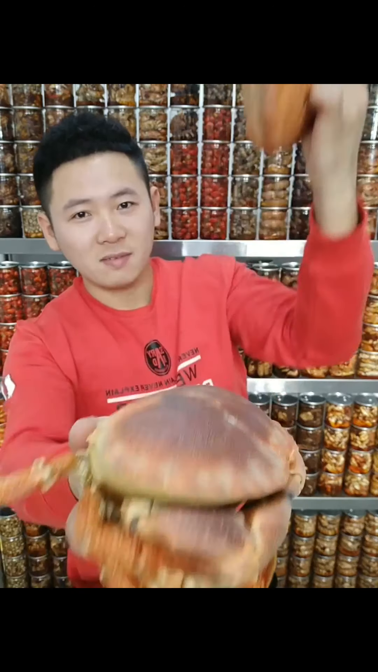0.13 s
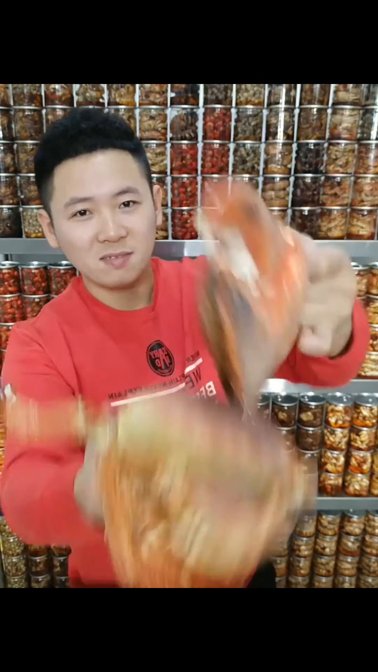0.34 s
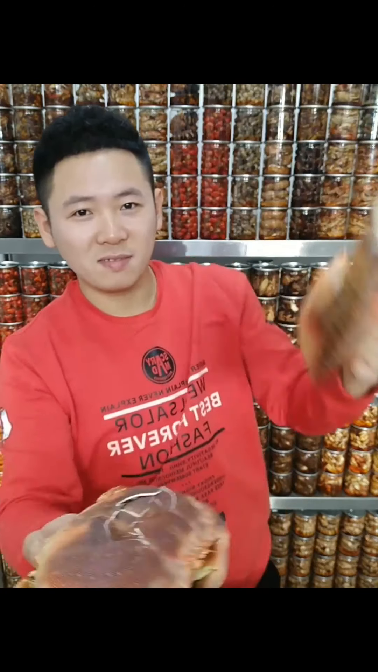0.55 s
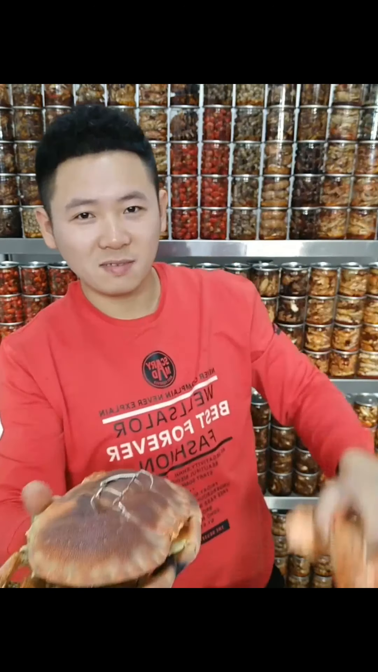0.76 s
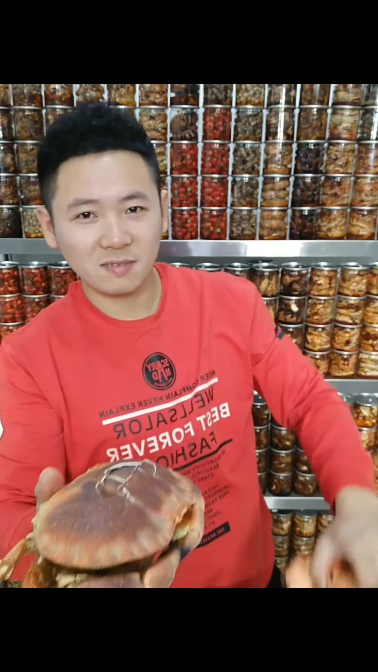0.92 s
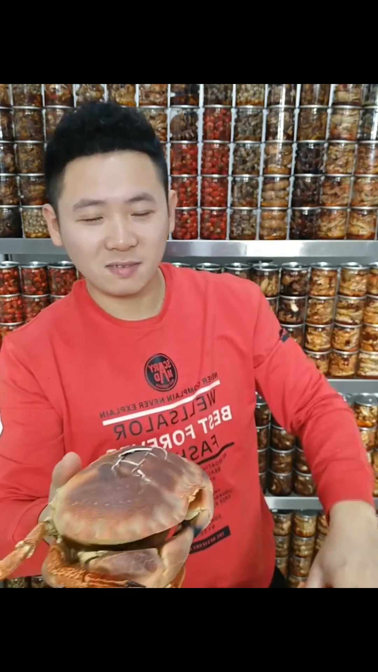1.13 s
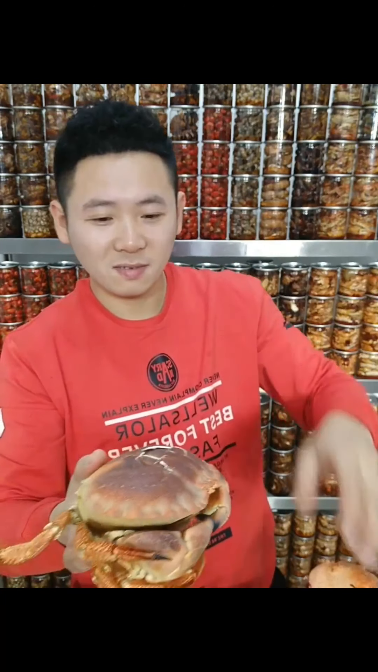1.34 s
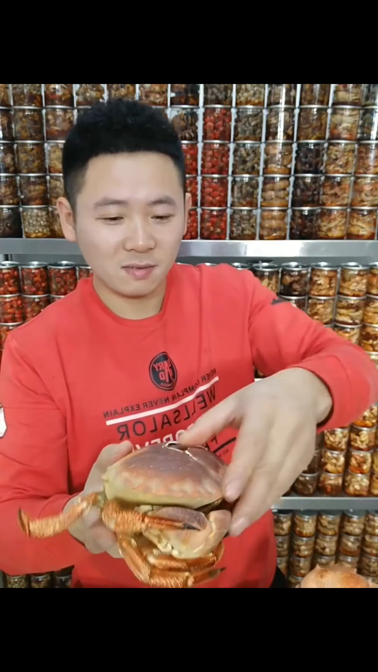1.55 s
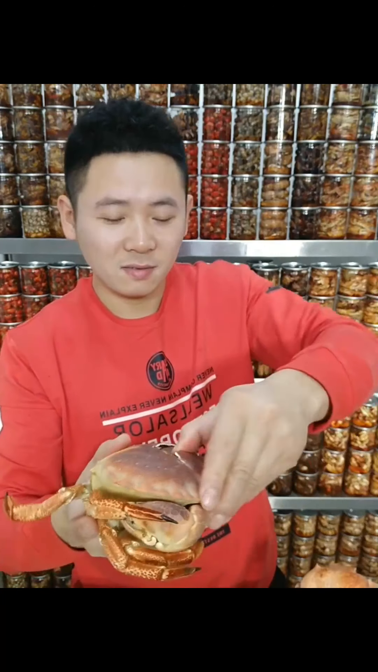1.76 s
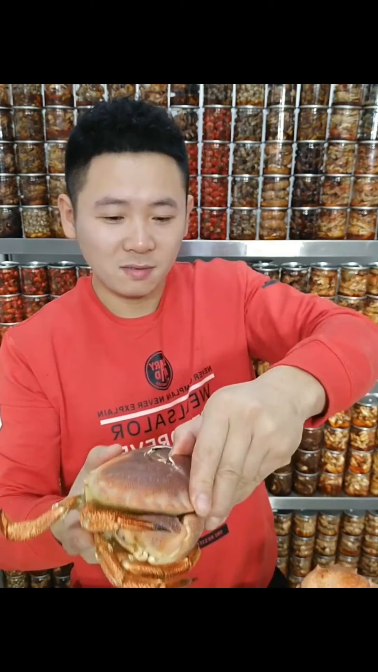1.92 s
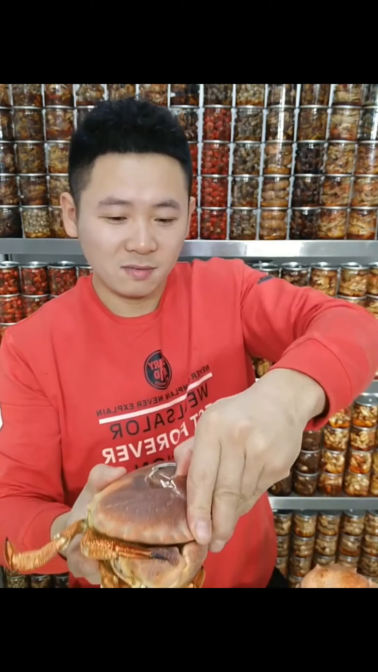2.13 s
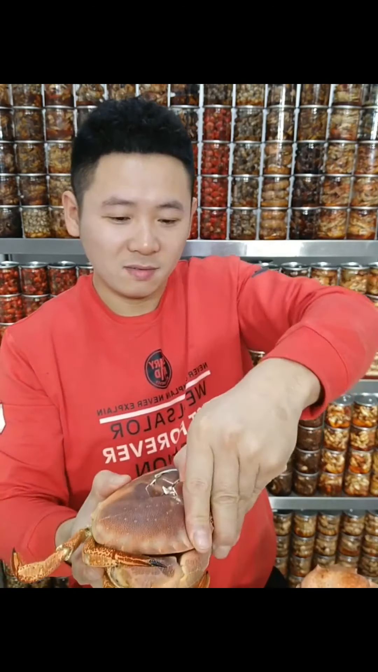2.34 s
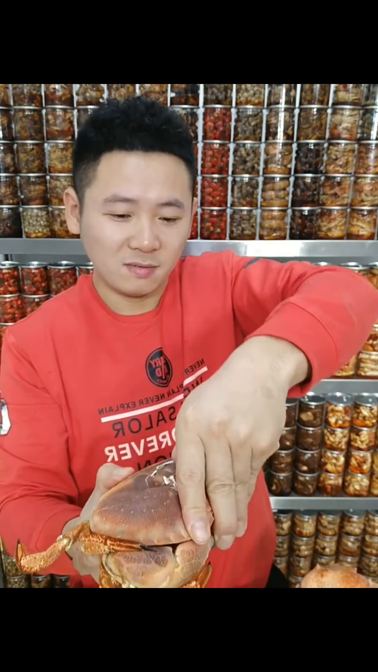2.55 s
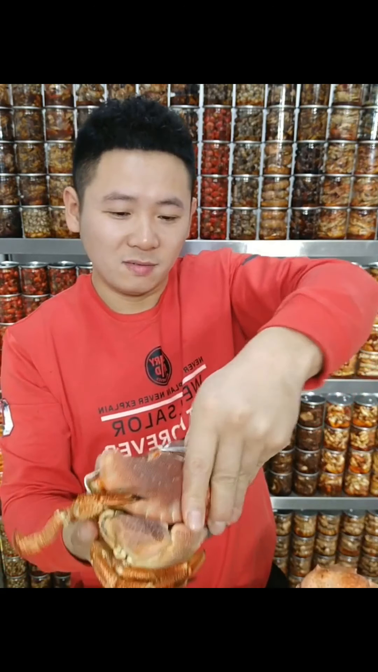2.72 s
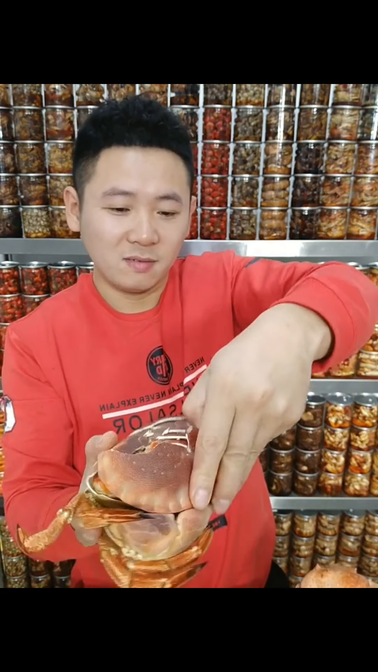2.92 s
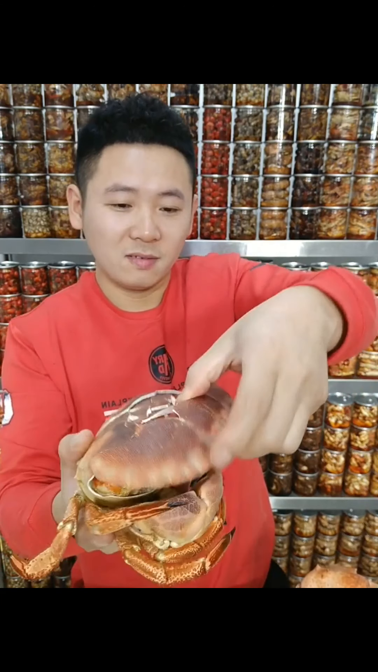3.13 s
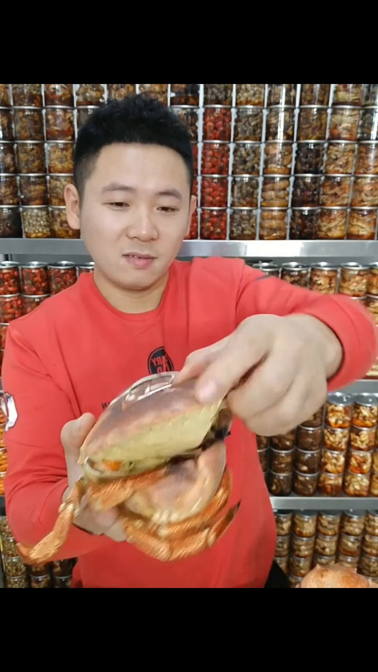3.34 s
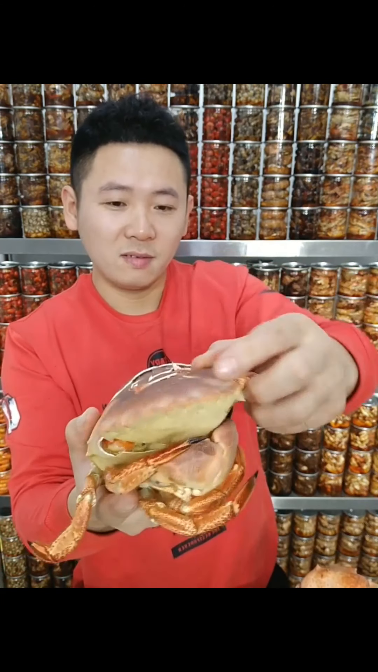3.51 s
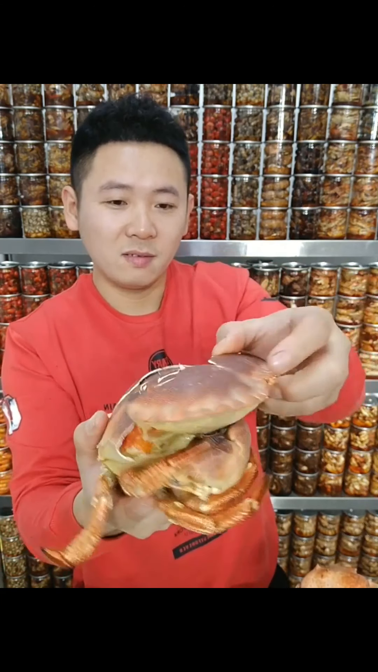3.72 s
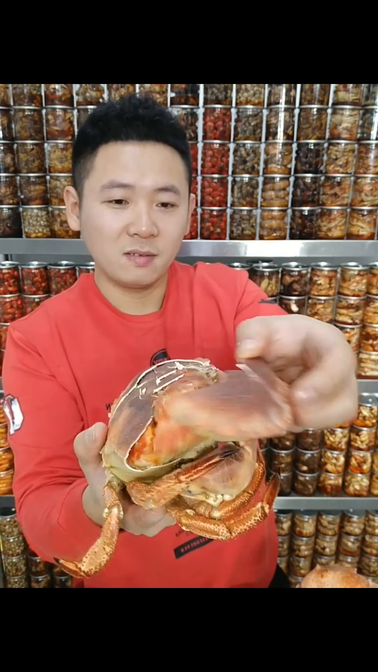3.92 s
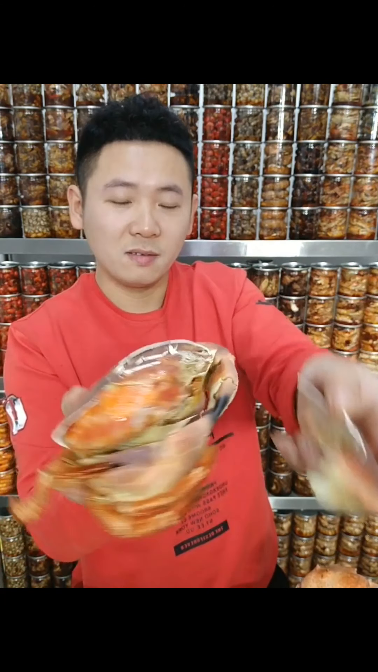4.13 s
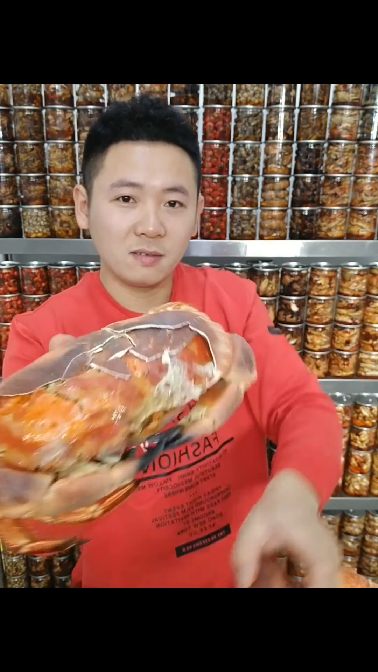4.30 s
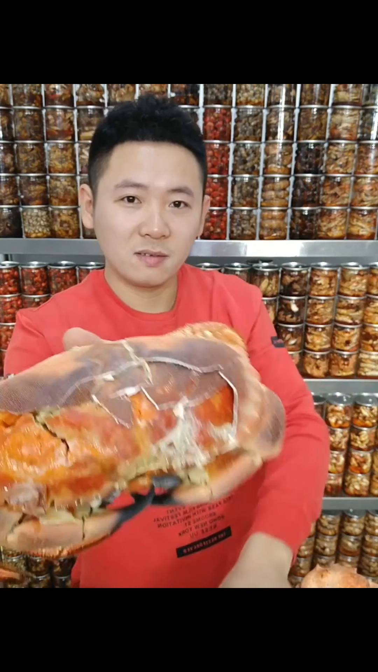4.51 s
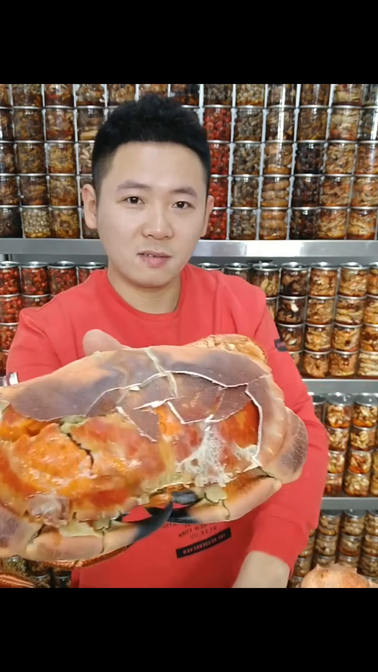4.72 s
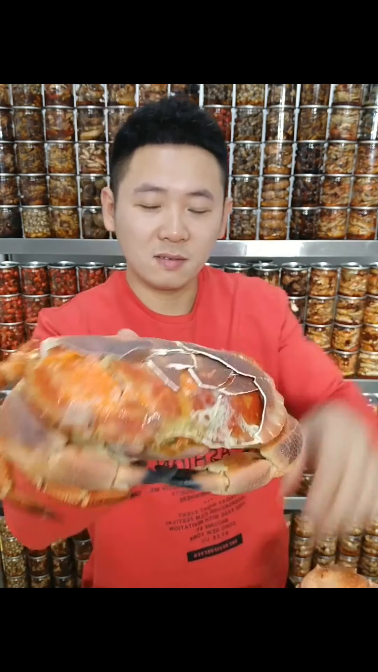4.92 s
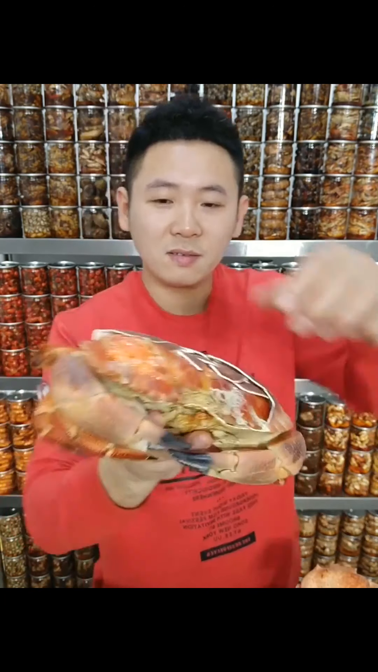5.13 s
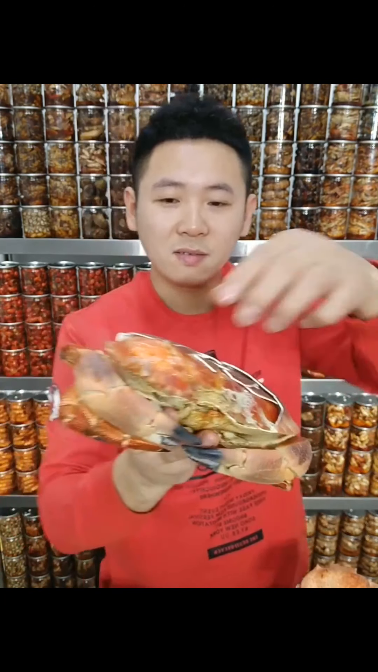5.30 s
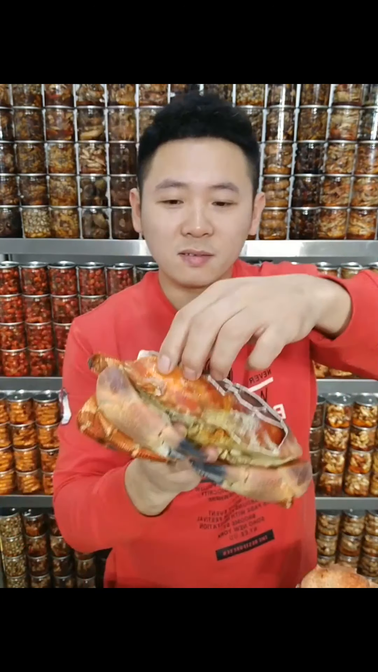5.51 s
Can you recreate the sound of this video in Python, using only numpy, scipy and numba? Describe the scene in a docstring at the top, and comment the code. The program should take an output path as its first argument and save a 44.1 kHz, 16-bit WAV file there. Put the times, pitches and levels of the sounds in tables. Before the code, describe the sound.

Close to a phone microphone in a hard-walled room, two light cracks lead to one violent blow on a cooked crab that overloads and rings a tray. Quiet follows, with one woody knock, faint ticks, then a cluster of strong crunching snaps and smaller brittle clicks as the shell is pulled open.

```python
"""Over a faint hum two light cracks, then one hard blow on a cooked crab; its shell is prised and cracked.
The cracks are short bursts of coloured noise; a tray and hollow parts ring as dying sines, and fingers rustle.
The hard-walled store room answers the cracks with wall echoes and a diffuse tail.
The phone microphone is close: hard hits overload it and pull its gain down late,
and a noise suppressor trims the tails before a steady hiss is added."""
import sys
import numpy as np
from scipy import signal
from scipy.fft import rfft, irfft, next_fast_len
from scipy.io import wavfile
from scipy.ndimage import uniform_filter1d, map_coordinates
from numba import njit

SR = 44100
rng = np.random.default_rng(int(sys.argv[2]) if len(sys.argv) > 2 else 0)


def unload_audio(sound):
    """Save the sound as a 16-bit wav file, at the path given as the first command line argument."""
    columns = np.transpose(np.atleast_2d(sound))
    # keep every value between -1 and 1, then stretch to whole-number steps
    steps = np.round(np.clip(columns, -1, 1) * 32767)
    wavfile.write(sys.argv[1], SR, steps.astype(np.int16))


N = 249606

# The hard blow, claw on shell, and its rebounds.
# Each row: start in seconds, level in dB, room answer against the direct sound in dB, note in Hz.
BLOW_HITS = [(0.571, 8, -7, 2160), (0.575, 5.5, 1, 1820), (0.5799, 3, 10.5, 2200), (0.5833, -2, -0.5, 2081)]
# Colour shared by all cracks and the rustle. Each row: frequency in Hz, relative level in dB.
SHELL_COLOUR = [(60, -24), (150, -10), (1200, 1.5), (2100, 1), (2900, 2), (3400, -5), (4400, -2),
                (5500, 0.5), (8000, 6), (11500, 15), (13400, 0.5)]


def cracks():
    """Each crack is a few ms of splintering noise; the room draws its colour out into a tail."""
    # Shell cracks. Each row: start in seconds, level in dB, time to fall 20 dB in ms, then the tone:
    # body at 800 Hz in dB, edge at 5 kHz in dB, sizzle at 10 kHz in dB, note of the piece in Hz.
    shell_cracks = [(0.3578, -50.5, 38, -1, -6, -29, 1850), (0.405, -32, 19.4, 11, 0.5, -20, 1850),
                    (1.0384, -46, 6.6, -5, 9.5, -10, 1780), (1.3505, -44, 8, 0.5, -53, -49.5, 1328),
                    (1.4223, -46.5, 30, -3.5, -20.5, -47, 1376), (1.474, -43.5, 12.4, 16, -40.5, -71, 1270),
                    (1.498, -11.5, 7.2, 10, -26, -73.5, 1476), (2.0088, -51, 6.9, -14.5, -42, -39.5, 2460),
                    (2.0229, -47, 3.1, -1, -24, -44, 1245), (2.0886, -47.5, 4.3, 3.5, -12, -38.5, 1847),
                    (2.1121, -54.5, 7.4, 2, -7, -51, 1788), (2.1723, -39.5, 2.4, 3, -6, -55, 1570),
                    (2.3061, -56, 7.8, -30, 1, -40, 1740), (2.363, -55.5, 9.3, -42, 2.5, -40, 2820),
                    (2.4266, -27, 8.2, 1, -10.5, -30, 2060), (2.581, -31, 7.8, 5, -3, -21.5, 2080),
                    (2.7874, -33, 17.2, -7.5, -8.5, -28.5, 2010), (2.833, -15, 9.2, -1.5, 3.5, -23.5, 2140),
                    (2.8446, -12.5, 5.1, -6, 1, -21, 2060), (2.856, -27, 6, 5, -15, -36, 1850),
                    (2.9045, -9.5, 6.7, -10, -7, -23.5, 1620), (2.9093, -8, 5.2, -5.5, -10, -60, 2370),
                    (2.9137, -3.5, 2.7, -5.5, -21, -29.5, 1806), (3.3971, -47.5, 9.2, -3, -11, -41, 1380),
                    (3.415, -43, 2.3, 5, -22, -63, 1310), (3.436, -45, 2.7, -3, -25.5, -65.5, 1298),
                    (3.45, -52, 1.9, 5.5, -19, -65.5, 1305), (3.5111, -52, 12.7, -3.5, -9, -29.5, 1274),
                    (3.538, -42, 3.1, -19.5, -9.5, -28.5, 1240), (3.6035, -53, 2.3, 10, -18, -46, 1300),
                    (3.6144, -40.5, 4.8, 0, -1, -32, 1224), (3.6432, -34, 3, 3, -22, -45.5, 1230),
                    (3.6682, -24, 3.64, -30, -7, -27.5, 2050), (3.708, -30.5, 6.9, -7, -15, -33, 2610),
                    (3.7155, -26.5, 3.14, 1.5, -26, -36.5, 1770),
                    (3.8366, -40.5, 9.6, -14.5, -23.5, -35.5, 1527),
                    (3.8534, -33.5, 2.3, -18.5, -24, -55, 1544),
                    (4.032, -55.5, 5.4, -26.5, -44, -58.5, 1580),
                    (4.0551, -29, 4.8, -13, -15.5, -66.5, 1795), (4.064, -35, 3.5, -3, -19.5, -69.5, 1850),
                    (4.1163, -42.5, 10.4, 3.5, 0, -43, 2790), (4.135, -34.5, 4.8, -13, -11, -45.5, 2835),
                    (4.142, -29, 6, -18.5, -10.5, -53, 2870), (4.1518, -24, 1.34, -5, -6.5, -48, 2860),
                    (4.307, -55, 3.9, -6.5, -8, -49.5, 2800), (4.747, -62, 27, 1, -16.5, -45.5, 2380),
                    (4.7949, -53, 12, 3, -13, -58.5, 2400), (4.8146, -28.5, 8.5, 7, -11, -34.5, 1702),
                    (4.8481, -21, 5.7, 0.5, -35, -79, 1460), (4.8649, -27.5, 3.7, -0.5, -13, -57, 1540),
                    (4.8932, -18.5, 5.13, 7.5, -12, -41, 1440), (5.2271, -53.5, 9.6, -6.5, -4, -16, 1380),
                    (5.243, -39, 16.6, -3, -5, -23.5, 1530), (5.3948, -48, 7.6, -27.5, -3.5, -17, 2150),
                    (5.474, -49, 10, -30, -2, -36, 2134)]
    room_base_db = -1.5
    faint_db, wetter = -34, .05  # fainter cracks sound wetter: room dB gained per dB under this level
    longer_db, usual_ms = 2.5, 6.76  # short cracks are aimed and dry: room dB gained per doubling of length
    upper_hz, upper_scatter = 4550, .03  # the pieces' upper note and its relative spread
    blow_ms, blow_upper_hz = 2, 4000  # the whole shell's upper note
    blow_colour_db = (-6.5, -13.5, -43)  # body, edge, sizzle

    rows = []
    for s, db, ms, *tone in shell_cracks:
        piece_upper_hz = upper_hz * (1 + upper_scatter * rng.standard_normal())
        room_db = room_base_db + wetter * (faint_db - db) + longer_db * np.log2(ms / usual_ms)
        rows.append((s, db, ms, room_db, *tone, piece_upper_hz))
    for s, db, room_db, note_hz in BLOW_HITS:
        rows.append((s, db, blow_ms, room_db, *blow_colour_db, note_hz, blow_upper_hz))
    rows = np.array(rows)

    t = np.arange(4096) / SR
    hz = np.fft.rfftfreq(len(t), 1 / SR)
    length_s = np.clip(rows[:, 2:3], 1, 60) / 1000
    envelope = amp(-20 * t / length_s) * (1 - np.exp(-t / (.1 * length_s)))
    burst = rng.standard_normal((len(rows), len(t))) * envelope
    colour = np.array([crack_colour(*tone, hz) for tone in rows[:, 4:]])
    snap = levelled(causal(burst, colour), length_s)

    # the tail's colour follows the snap's peaks and notches less strongly
    burst_db = 20 * np.log10(np.abs(rfft(burst)) + .1)
    tail_source = causal(burst, colour - .35 * burst_db)
    walls, tail = room(len(rows))
    answer = signal.fftconvolve(levelled(tail_source, length_s), tail, axes=1)
    answer[:, :len(t) + len(walls) - 1] += signal.fftconvolve(snap, walls[None], axes=1)

    track = np.zeros(N)
    for (s, db, _, room_db), direct, wet in zip(rows[:, :4], snap, answer):
        add(track, s, amp(db) * direct)
        add(track, s, amp(db + room_db) * wet)
    return track


def crack_colour(body_db, edge_db, sizzle_db, note_hz, upper_hz, hz):
    """Response of a crack in dB: its band levels and the two notes of the piece, over the shell's colour."""
    bass_db = -5 + 1.8 * body_db  # the 280 Hz level swings wider than the body
    bands = along([(280, bass_db), (800, body_db), (2000, 0), (5000, edge_db), (10000, sizzle_db)], hz)
    note = 7 / (1 + ((hz - note_hz) / 150) ** 2)
    upper_note = 8 / (1 + ((hz - upper_hz) / 200) ** 2)
    return bands + note + upper_note + along(SHELL_COLOUR, hz)


def causal(x, db):
    """Rows of x coloured by dB per FFT bin in minimum phase, so nothing rings ahead of the hit."""
    size = 2 * (db.shape[-1] - 1)
    cepstrum = irfft(np.log(amp(db) + 1e-6), size)
    # fold the cepstrum onto positive time
    cepstrum[:, 1:size // 2] *= 2
    cepstrum[:, size // 2 + 1:] = 0
    return irfft(rfft(x, size) * np.exp(rfft(cepstrum)), size)


def levelled(x, length_s):
    """Rows scaled so that energy in the 1.2-3.5 kHz band goes with their length."""
    band_filter = signal.butter(2, [1200, 3500], "band", fs=SR, output="sos")
    band = signal.sosfilt(band_filter, x)
    return x / np.linalg.norm(band, axis=1, keepdims=True) * np.sqrt(length_s * SR) * 0.24


def room(count):
    """Answers of the room: wall echoes, then a diffuse tail in which each frequency dies at its own speed."""
    # Decay of the tail. Each row: frequency in Hz, time to fall 60 dB in seconds.
    decay = [(60, 0.092), (200, 0.39), (500, 0.78), (1200, 0.61), (3000, 0.63), (5000, 0.61), (9000, 0.5),
             (13000, 0.4)]
    # First echoes off the walls. Each row: delay in seconds, level in dB.
    first_echoes = [(.0095, -10.5), (0.0126, -7.5), (0.018, -14.5), (.024, -22)]
    hz, age, z = signal.stft(rng.standard_normal((count, SR)), SR, nperseg=256, noverlap=128)
    fading = z * amp(-60 * age / along(decay, hz)[:, None])
    tail = signal.istft(fading, SR, nperseg=256, noverlap=128)[1][:, :SR]
    # the diffuse field builds up gradually from 7 ms on
    since_onset = np.maximum(np.arange(SR) / SR - .007, 0)
    tail = tail * (1 - np.exp(-since_onset / 0.0072)) * amp(-30)
    walls = np.zeros(SR // 20)
    for delay, db in first_echoes:
        walls[round(delay * SR)] = amp(db)
    return walls, tail


def body():
    """Short dull notes of the hollow parts, and the notes that linger after the hard blow, as dying modes."""
    # Hollow parts of the crab answer some cracks. Each row: start in seconds, level in dB, note in Hz.
    thumps = [(2.428, -49, 220), (2.582, -49, 216.4), (2.836, -45.5, 208), (2.908, -39, 224),
              (3.708, -79, 230), (4.06, -56.5, 553), (4.14, -54.5, 524), (4.893, -43, 219)]
    # The struck shell's lingering notes. Each row: note in Hz, level in dB.
    dome = [(1770, -34), (2110, -37.5), (4040, -37.5)]
    track = np.zeros(N)
    for s, db, hz in thumps:
        add(track, s, ring(hz, db, t60=.19, rise=.0045, blur=9.2))
    for hz, db in dome:
        add(track, BLOW_HITS[0][0], ring(hz, db, t60=.7, rise=.03, blur=25))
    return track


def tray():
    """Knocks ring the tray's modes; the hard blow also shakes something big and low."""
    # Knocks on the tray. Each row: start in seconds, level in dB, brightness in dB per octave, rise in ms.
    knocks = [(0.41, -34, -3, 5), (0.574, -16.5, 4.5, 2), (1.035, -34, -11, 9), (1.499, -22.5, 1.5, 1.4),
              (4.815, -36, -14.5, 1.23), (5.242, -55.5, -9.5, 4.3)]
    # Modes of the tray. Each row: frequency in Hz, relative level in dB, time to fall 60 dB in seconds.
    modes = [(394.6, -2, 0.39), (653, -1, 0.23), (871, 1, 0.046), (903, -10.5, 0.6), (1400, -16, 0.44)]
    track = np.zeros(N)
    for s, db, tilt_db, rise_ms in knocks:
        for hz, mode_db, t60 in modes:
            octave = np.log2(hz / modes[0][0])
            level_db = db + mode_db + tilt_db * octave + rng.normal(0, 2)
            add(track, s, ring(hz, level_db, t60, rise_ms / 1000, blur=5))
    blow_s = BLOW_HITS[0][0]
    add(track, blow_s, ring(hz=87.3, db=-22, t60=.9, rise=.15, blur=1))
    # the thud of the whole body under the blow
    add(track, blow_s, ring(hz=105, db=-11, t60=.2, rise=.002, blur=12))
    return track


def rustle():
    """Fingers slide on the shell: lumpy noise in the shell's colour, each stroke rising, holding and fading."""
    # Fingers on the shell. Each row: start in seconds, length of the hold in seconds, level in dB.
    strokes = [(1.33, 0.052, -69), (1.9, 0.82, -84.5), (3.417, 0.21, -71.5), (4.761, 0.069, -86),
               (5.354, 0.37, -73)]
    rise_s, fall_s = 0.02, 0.073
    t = np.arange(N) / SR
    level = np.zeros(N)
    for s, hold_s, db in strokes:
        corners = np.cumsum([s, rise_s, hold_s, fall_s])
        level += amp(db) * np.interp(t, corners, [0, 1, 1, 0])
    skin = [(300, 5), (900, 18.0), (3000, 7.5), (6000, -20.5), (7500, -58)]  # Hz, dB
    noise = filtered(rng.standard_normal(N), lambda hz: amp(along(SHELL_COLOUR, hz) + along(skin, hz)))
    lumps = amp(3 * wobble(60) + 2.5 * wobble(15))
    return level * unit(noise * lumps)


def background():
    """A hum of two phase-wandering tones with a fringe of noise, and a few faint low tones."""
    # Level of the hum over time. Each row: time in seconds, level in dB.
    hum_level = [(0, -60.5), (.054, -72.5), (.156, -60.5), (.43, -58), (1.22, -68.5), (1.36, -91),
                 (1.55, -67.5), (2.05, -90), (2.9, -74), (3.25, -89), (4.7, -84), (4.9, -69), (5.2, -86),
                 (5.35, -71), (5.66, -73.5)]
    # Colour of the noise fringe. Each row: frequency in Hz, relative level in dB.
    fringe_colour = [(20, -46), (60, -37.5), (80, -7.5), (94, 11.5), (110, -10.5), (130, -27), (300, -49),
                     (500, -65.5)]
    # Faint soft tones. Each row: middle in seconds, frequency in Hz, level in dB, length in seconds.
    low_tones = [(4.402, 208, -75.5, 0.028), (4.553, 221.4, -75.5, 0.16), (5.611, 226, -69, 0.084)]
    fringe = unit(filtered(rng.standard_normal(N), lambda hz: amp(along(fringe_colour, hz))))
    hum = wavering(hz=94, blur=4) + amp(-9) * wavering(hz=106, blur=5) + amp(-7) * fringe
    t = np.arange(N) / SR
    tones = np.zeros(N)
    for s, hz, db, length_s in low_tones:
        swell = np.exp(-((t - s) / (length_s / 2)) ** 2)
        tones += amp(db) * swell * wavering(hz, blur=12)
    return amp(curve(hum_level)) * hum + tones


def ring(hz, db, t60, rise, blur):
    """One dying mode, t60 and rise in seconds, whose phase wanders by blur radians (rms) in a second."""
    t = np.arange(SR) / SR
    wander = blur * np.cumsum(rng.standard_normal(SR)) / np.sqrt(SR)
    return amp(db - 60 * t / t60) * (1 - np.exp(-t / rise)) * np.sin(2 * np.pi * hz * t + wander)


def wavering(hz, blur):
    """A tone of rms 1 whose phase wanders by blur radians (rms) in a second."""
    wander = blur * np.cumsum(rng.standard_normal(N)) / np.sqrt(SR)
    return np.sqrt(2) * np.sin(2 * np.pi * hz * np.arange(N) / SR + wander)


def wobble(rate):
    """A smooth random curve, rate knots a second."""
    return map_coordinates(rng.standard_normal(int(N * rate / SR) + 4), [np.arange(N) * rate / SR])


def amp(db):
    """Gain of a level in dB."""
    return 10 ** (np.asarray(db) / 20)


def unit(x):
    """Each row at rms 1."""
    return x / np.sqrt(np.mean(x ** 2, axis=-1, keepdims=True) + 1e-30)


def along(points, hz):
    """(Hz, value) points read off on a log frequency axis."""
    f, v = np.transpose(points)
    return np.interp(np.log(hz + 1), np.log(f + 1), v)


def curve(rows):
    """A level in dB for each sample, silent outside the rows."""
    s, db = np.transpose(rows)
    return np.interp(np.arange(N) / SR, s, db, left=-200, right=-200)


def filtered(x, response):
    """x times a response of frequency."""
    m = next_fast_len(N + SR // 2)
    return irfft(rfft(x, m) * response(np.fft.rfftfreq(m, 1 / SR)), m)[..., :N]


def add(track, s, sound):
    """Mix a sound in at s seconds."""
    part = track[round(s * SR):][:len(sound)]
    part += sound[:len(part)]


def scene():
    """All sources at the one microphone."""
    return (cracks() + body() + tray() + rustle() + background())[None]


@njit
def follow(x, up, down):
    """Peak level of x, rising and falling at their own speeds."""
    level = np.zeros(len(x))
    for i in range(1, len(x)):
        step = abs(x[i]) - level[i - 1]
        level[i] = level[i - 1] + step * (up if step > 0 else down)
    return level


def squeeze(level, knee_db):
    """Gain that holds a level down to the knee."""
    return 1 / (1 + (level / amp(knee_db)) ** 4) ** (1 / 4)


def suppress(x):
    """Noise suppression: cells that sink towards the quiet threshold are turned down, so tails end early."""
    # What the suppressor takes for noise. Each row: frequency in Hz, level in dB a bin.
    threshold = [(150, -100), (500, -95.5), (2000, -99.5), (5000, -102), (9000, -96.5)]
    hz, _, z = signal.stft(x, SR, nperseg=512, noverlap=384)
    over_time = uniform_filter1d(np.abs(z) ** 2, size=9, axis=-1)
    power = np.abs(uniform_filter1d(over_time, size=3, axis=-2))
    quiet = amp(along(threshold, hz))[:, None] ** 2 * (hz[:, None] > 130)  # the lowest bass is left alone
    kept = z * power / (power + quiet + 1e-30)
    return signal.istft(kept, SR, nperseg=512, noverlap=384)[1][..., :N]


def record(dry):
    """Overload clips the peaks and starves the downward swings; the gain control reacts late."""
    # The microphone's treble step. Each row: frequency in Hz, gain in dB.
    treble_step = [(5600, -2), (6900, -12), (8000, -10.5), (13000, -8.5)]
    # The recorder's own hiss. Each row: frequency in Hz, relative level in dB.
    hiss_colour = [(180, -35.5), (300, -4), (509, -19.5), (713, -18.5), (1870, -15), (2050, -19),
                   (13800, -18.5)]
    top_hz = 13980  # nothing is kept from here up
    clipped = dry / (1 + np.abs(dry / .4) ** 4) ** (1 / 4)
    # follower time constants in seconds, times SR
    strain = follow(dry[0], 1 / (.006 * SR), 1 / (.05 * SR))
    lopsided = clipped * np.where(dry > 0, 1, squeeze(strain, knee_db=-22))
    level = follow(dry[0], 1 / (.004 * SR), 1 / (.008 * SR))
    late = np.pad(level, (round(.012 * SR), 0))[:N]
    bass_cut = signal.butter(2, 70, "high", fs=SR, output="sos")
    cut = signal.sosfilt(bass_cut, lopsided * squeeze(late, knee_db=-19.5))
    coloured = filtered(cut, lambda hz: amp(along(treble_step, hz)))
    hiss = unit(filtered(rng.standard_normal(N), lambda hz: amp(along(hiss_colour, hz))))
    return filtered(suppress(coloured) + amp(-87) * hiss, lambda hz: hz < top_hz)


dry = scene()
out = record(dry)
unload_audio(out)
```